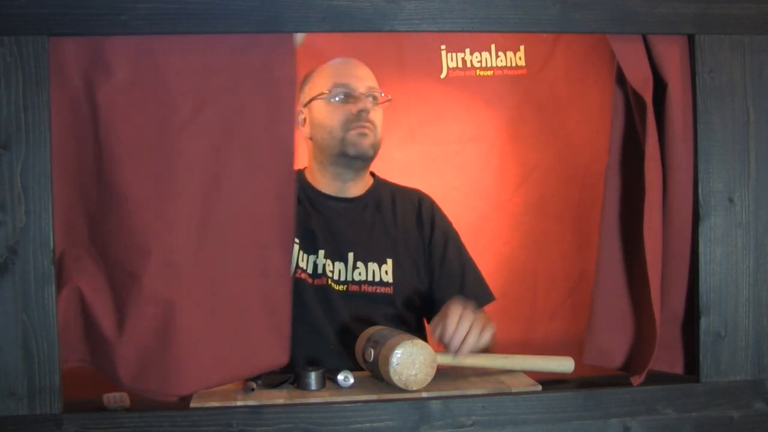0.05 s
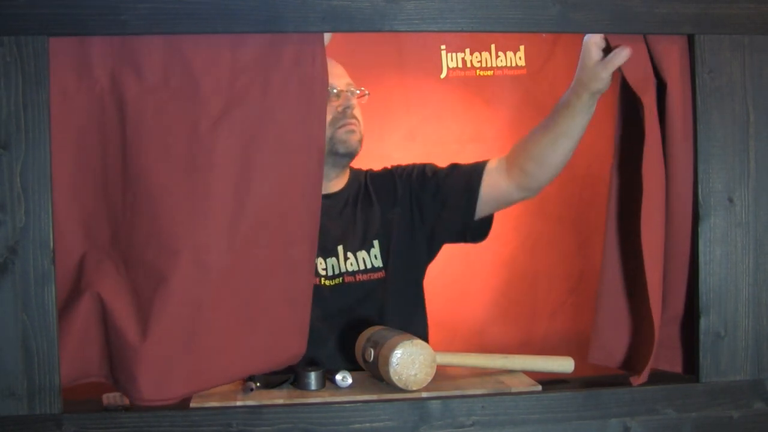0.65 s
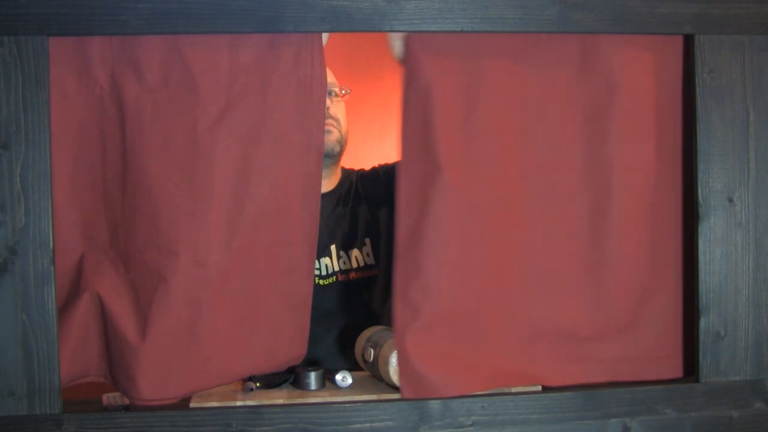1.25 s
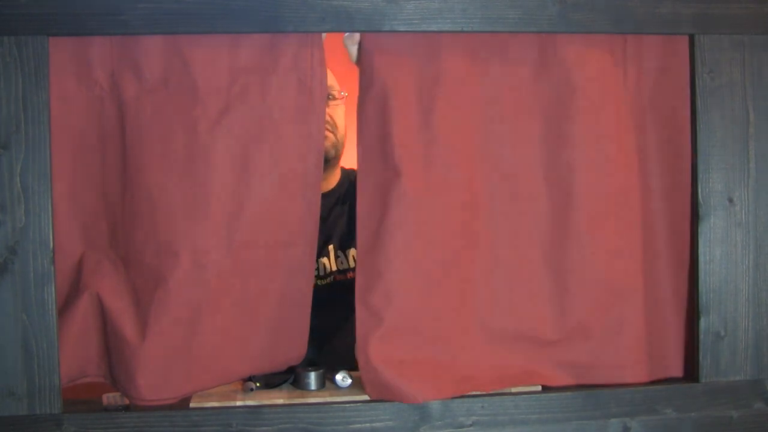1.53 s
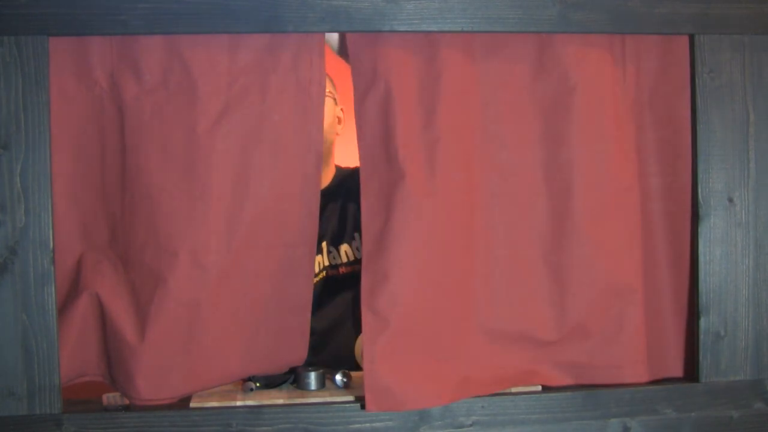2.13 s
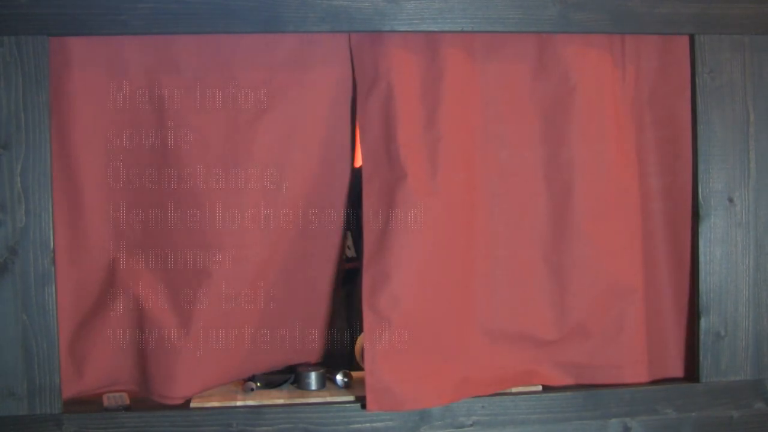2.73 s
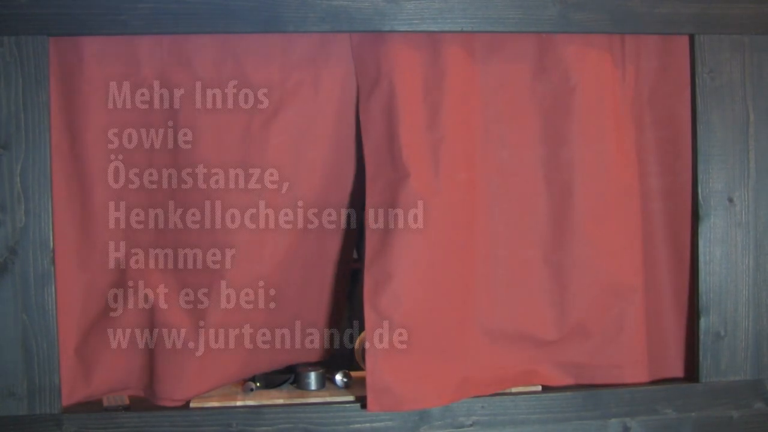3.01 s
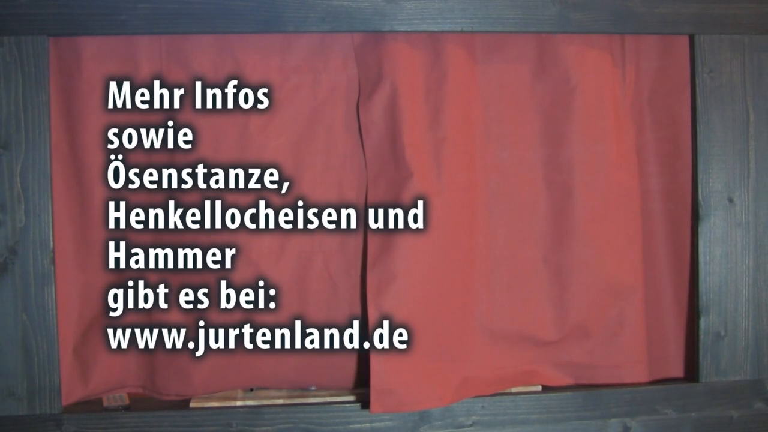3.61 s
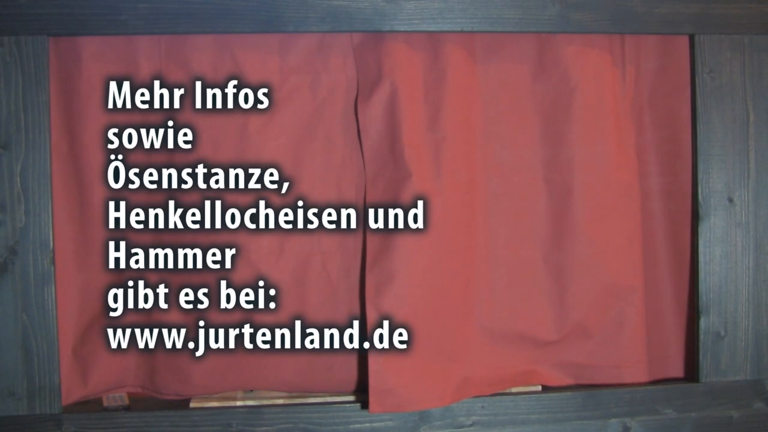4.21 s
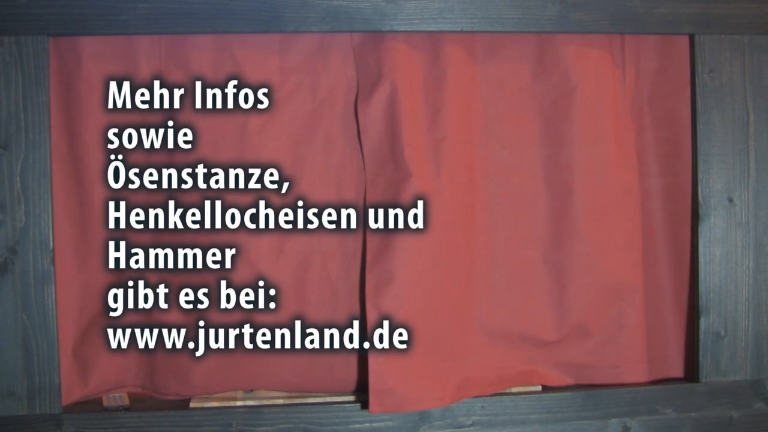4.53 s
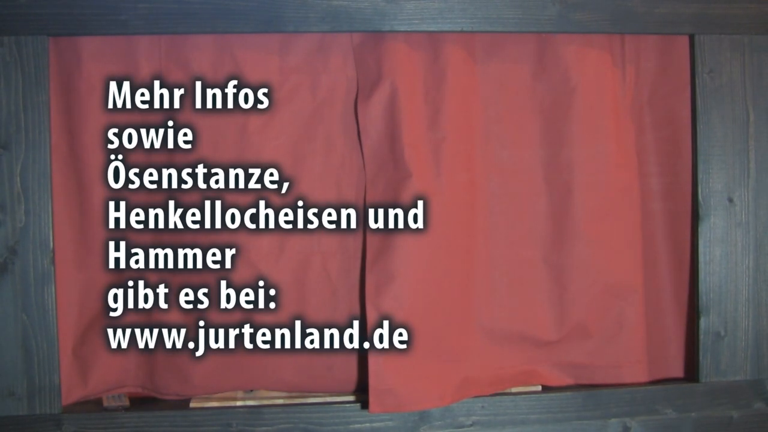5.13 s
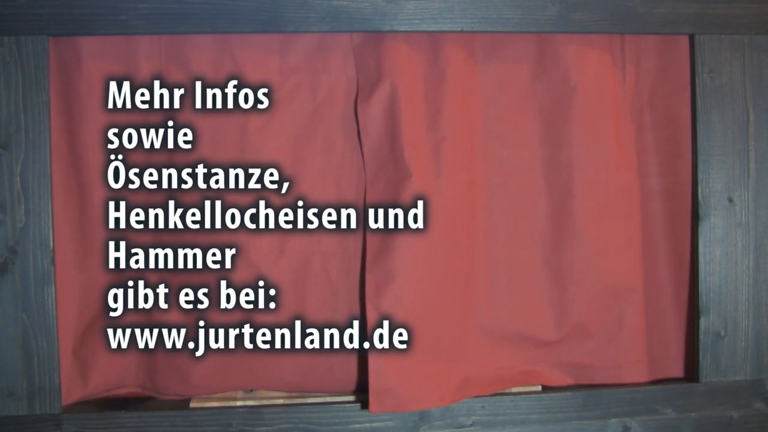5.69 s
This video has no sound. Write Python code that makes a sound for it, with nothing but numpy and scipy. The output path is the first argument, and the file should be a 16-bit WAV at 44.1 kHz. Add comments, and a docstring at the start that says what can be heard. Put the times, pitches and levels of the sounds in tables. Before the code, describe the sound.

Curtains are pulled shut by hand in a wooden booth, rasping and lightly rattling their eyelets, followed by soft clicks and knocks.

```python
"""A short rasping tug of heavy cloth comes first: curtains pulled shut by hand along a rod, in a small
wooden booth, close to a near-mono microphone. Pull after pull, the hem sticks and slips over the rod
and rings the frame; the weave zips, metal eyelets chatter and the folds puff air. The cloth settles,
leaving small ticks and dull wooden knocks over faint shuffling, room rumble, mains hum and hiss."""
import sys
import numpy as np
from scipy import signal
from scipy.fft import rfft, irfft
from scipy.io import wavfile
from scipy.ndimage import uniform_filter1d

SR = 44100
rng = np.random.default_rng(int(sys.argv[2]) if len(sys.argv) > 2 else 0)


def dump_mix(stems):
    """Bounce the given channels to the path in sys.argv[1] as a 16-bit WAV at rate SR."""
    frames = np.atleast_2d(stems).T  # one column per channel
    limited = np.clip(frames, -1, 1)  # hard clip at full scale
    pcm = np.round(limited * 32767).astype(np.int16)
    wavfile.write(sys.argv[1], SR, pcm)


N = 258407
T = np.arange(N) / SR

# each pull or brush of the cloth: (start [s], rise [s], slide [s], level [dB],
# change over the slide [dB], relative fibre hiss [dB], relative frame body [dB])
PULLS = [ (0.022, 0.0029, 0.051, -37, -5, -4.5, -6.5), (0.076, 0.0028, 0.074, -30, 1, -7, -12),
         (0.270, 0.1, 0.087, -35.5, 4.5, -12.5, -7), (0.560, 0.057, 0.049, -50, -1.5, -4, 2),
         (0.700, 0.048, 0.16, -57, -1, -2, -9), (0.895, 0.025, 0.056, -47.5, 0.5, 1.5, -12),
         (0.960, 0.045, 0.14, -41, -2, 0.5, -4), (1.110, 0.035, 0.19, -37, -1, -8.5, -10),
         (1.320, 0.043, 0.19, -38.5, -2.5, -9.5, -9.5), (1.735, 0.1, 0.037, -50.5, -3, -9, -7.5),
         (2.096, 0.004, 0.019, -52, -7, -1.5, -27), (2.140, 0.045, 0.052, -63.5, -2.5, -2, -10),
         (2.290, 0.069, 0.17, -56, -3, -7, -7), (2.502, 0.0074, 0.057, -34, -8.5, -6.5, -10),
         (2.530, 0.037, 0.099, -28.5, -2.5, -11.5, -11.5), (2.700, 0.046, 0.030, -42, 4.5, -15, -16),
         (2.772, 0.006, 0.029, -32, -1, -4.5, -4), (2.790, 0.036, 0.086, -27, -5.5, -10, -11.5),
         (2.980, 0.051, 0.052, -53.5, 0, -12, -4), (3.100, 0.044, 0.038, -50.5, 0.5, -14.5, -10.5),
         (3.372, 0.006, 0.15, -48, -12.5, -4.5, -4.5), (3.531, 0.0043, 0.13, -48.5, -3.5, -7.5, -4.5),
         (3.665, 0.052, 0.011, -49, -8.5, -5, -5), (3.962, 0.0051, 0.012, -56, -10, 0, 4),
         (3.995, 0.031, 0.02, -55.5, 1.5, -6.5, -6), (5.565, 0.024, 0.03, -64.5, 0.5, -6, 8.5),
         (5.680, 0.035, 0.030, -72, -3, 7, -9), ]
# spectrum of the rubbing cloth, heard close: (frequency [Hz], level [dB])
CLOTH_COLOUR = [(35, -67), (60, -25), (124, -13), (156, -1.5), (198, -3.5), (256, 2.5), (301, -0.5),
                (566, -4.5), (666, -3), (767, -2), (946, -1.5), (1740, -4.5), (6580, -17.5), (11800, -30),
                (16000, -46)]
# resonances of rod and frame: (frequency [Hz], width [Hz], level [dB])
FRAME_MODES = [(254.6, 19, -1.5), (468, 23, -6), (573, 15, 4.5), (740, 9.3, 6.5), (885, 22, -3.5),
               (1150, 130, -12.5), (1502, 24, -1.5), (2350, 28, -11), (2660, 8.4, -29)]
# the hem breaks free in a short rasp: (start [s], level [dB], length [s])
JERKS = [(0.014, -43.5, 0.018), (0.078, -26, 0.016), (0.443, -36.5, 0.03), (0.597, -43.5, 0.022),
         (1.005, -28, 0.036), (1.299, -39, 0.026), (1.822, -53, 0.088), (2.087, -56.5, 0.041),
         (2.814, -27, 0.018)]
# the weave runs over the rod: (start [s], length [s], first thread rate [Hz], final [Hz], level [dB])
ZIPS = [(0.077, 0.097, 798, 500, -38), (1.119, 0.205, 2700, 480.5, -37.5), (2.518, 0.21, 2002, 403, -38.5),
        (2.553, 0.0707, 616, 397, -40.5), (2.805, 0.066, 640, 448, -33.5)]
# metal eyelets chatter on the rod: (start [s], level [dB], length [s])
CHATTERS = [(0.022, -45, 0.011), (0.065, -43, 0.043), (0.138, -43, 0.023), (0.364, -44, 0.023),
            (0.445, -50, 0.025), (1.135, -48, 0.023), (1.295, -56, 0.024)]
# resonances of the eyelets: (frequency [Hz], width [Hz], level [dB])
EYELET_MODES = [(5070, 61, 13), (5570, 110, 7), (6200, 120, -1), (8500, 76, 8), (11450, 120, -10),
                (12150, 140, 0), (12700, 150, -10)]
# the hem catches on the rod: (time [s], impulse level [dB])
TICKS = [(1.6758, -26.5), (3.3733, -23.5), (3.5342, -26), (3.5612, -24), (3.9642, -42)]
# spectrum of one tick: (frequency [Hz], gain [dB])
TICK_COLOUR = [(60, -18), (200, 19), (400, 10), (1200, 13.5), (5000, 2), (9000, -17), (16000, -30)]
# dull knocks on the wood: (time [s], level before dulling [dB], contact brightness [Hz])
KNOCKS = [(0.338, -17.5, 1370), (1.6755, -25.5, 3440), (1.834, -31.5, 2500), (2.03, -40, 3520),
          (2.099, -34.5, 2020), (2.372, -39, 2000), (3.1531, -26.5, 2270), (3.3214, -34.5, 1640),
          (3.339, -33.5, 850), (4.657, -21, 1830), (5.588, -34, 740), (5.61, -39.5, 1510),
          (5.821, -32.5, 445)]
# resonances of the wood: (frequency [Hz], level [dB], t60 [s])
WOOD_MODES = [(173, -14.5, 0.19), (244.6, -13.5, 0.22), (363, -7.5, 0.062), (477, -10.5, 0.062),
              (552, -16.5, 0.1), (793, 0.5, 0.032), (870, -10, 0.052), (1020, -7, 0.03), (1166, -5, 0.058),
              (1240, 0, 0.018), (1494, -6.5, 0.024), (1723, -6.5, 0.027)]
# the frame's panel drones under a pull: (start [s], level [dB], length [s])
DRONES = [(0.40, -39, 0.11), (0.63, -53, 0.089), (2.58, -57, 0.3), (2.78, -34, 0.1)]
# puffs of air from the folds: (start [s], level [dB], length [s])
BILLOWS = [(0.03, -52.5, 0.14), (1.0, -59, 0.21), (1.19, -60, 0.14), (2.505, -53, 0.059)]
# shuffling behind the curtain: (start [s], relative level [dB], length [s])
SHUFFLES = [(0.62, -43.5, 0.15), (3.2, -49, 0.17), (4.0, -48, 0.15), (4.13, -55.5, 0.25), (5.15, -56, 0.15),
            (5.8, -60, 0.11)]
# muffled spectrum of that shuffling: (frequency [Hz], level [dB])
SHUFFLE_COLOUR = [(59, -10), (100, -27), (135, -7.5), (173, -17), (253, 1.5), (350, -5.5), (402, -25),
                  (553, -22), (700, -17), (910, -48), (1540, -120)]
# room tone at the microphone, rumble up to hiss: (frequency [Hz], level [dB])
ROOM_TONE_COLOUR = [(12, -37), (20, -29), (53, -21), (91, -5), (154, 2.5), (204, -2.5), (399, -9.5),
                    (558, -11), (1220, -15.5), (2600, -19.5), (2820, -19.5), (6910, -22.5), (12400, -26),
                    (14300, -21), (16000, -35)]
# faint noise in the side channel: (frequency [Hz], level [dB])
SIDE_COLOUR = [(12, -37), (20, -15), (101, 6.5), (182, -0.5), (542, -4), (590, -12.5), (4940, -11),
               (14700, -10), (16000, -9)]


def hem_scrape(rasp_db=-1, hiss_db=-1.5, body_db=-1.5):
    """Slips of the hem sound through cloth and frame; pressure moves the body, speed the hiss."""
    grip = undb(walk(130))
    friction = grip * (slips(per_s=3500, spread_db=0) + undb(1.5) * rng.standard_normal(N))
    cloth = colour(friction, CLOTH_COLOUR)
    cloth = unit(cloth + sum(undb(db) * ring(cloth, hz, width) for hz, width, db in FRAME_MODES))
    body = unit(cut(cut(cloth, 476, "low", order=4), 64, "high"))
    rasp = unit(cut(cloth, [420, 3200], "band", order=4))
    hiss = unit(cut(cloth, 3490, "high", order=4))
    power = np.zeros((3, N))  # overlapping pulls add in power, band by band
    for start, rise, slide, db, change_db, speed_db, press_db in PULLS:
        shares = undb([rasp_db, speed_db + hiss_db, press_db + body_db])
        power += np.outer(shares ** 2, pull_gain(start, rise, slide, db, change_db) ** 2)
    return np.sum(np.sqrt(power) * [rasp, hiss, body], axis=0)


def pull_gain(start, rise, slide, db, change_db, climb_db=15, run_out_db_per_s=214):
    """One pull gathers speed, slides on, and dies away once the hand stops."""
    since = T - start
    pulling_db = np.interp(since, [0, rise, rise + slide], [db - climb_db, db, db + change_db])
    run_out_db = run_out_db_per_s * np.maximum(since - rise - slide, 0)
    return undb(pulling_db - run_out_db) * (since >= 0)


def fold_jerks():
    """A bunched fold lets go: a quick, brighter shower of slips."""
    spectrum = [(100, -27), (400, 7.5), (1000, 4), (4000, 2.5), (8000, -7.5), (16000, -18.5)]
    shower = unit(colour(slips(per_s=20000, spread_db=6), spectrum))
    swell = sum(gate([s, s + length / 2, s + length], [db - 6, db, db - 11]) for s, db, length in JERKS)
    return shower * swell


def weave_zips(overtone_db=-12, speed_spread=.08, side_fold_db=-5, brake_share=.35, edge_db=7):
    """Threads of three folds bump over the rod at slightly different speeds: a ragged, falling buzz."""
    out = 0
    for start, length, first_hz, final_hz, db in ZIPS:
        braking = np.maximum(T - start, 0) / (brake_share * length)  # 1 halfway down the fall
        thread_hz = final_hz + (first_hz - final_hz) / (1 + braking ** 3)
        buzz = 0
        for fold in (-1, 0, 1):
            fold_hz = thread_hz * (1 + fold * speed_spread + .1 * walk(900))
            phase = 2 * np.pi * np.cumsum(fold_hz) / SR
            tone = np.sin(phase) + undb(overtone_db) * np.sin(2 * phase)
            buzz += tone * undb(2 * walk(200) + side_fold_db * abs(fold))
        corners = start + length * np.array([0, .2, .6, 1])
        out += unit(buzz) * gate(corners, [db - edge_db, db, db, db - edge_db])
    # a zip flares where it falls through the rod's resonance
    return out + undb(3) * ring(out, hz=780, width_hz=39)


def eyelet_chatter():
    """Showers of tiny contacts with the rod ring the metal eyelets."""
    contacts = slips(per_s=1200, spread_db=2)
    metal = sum(undb(db) * ring(contacts, hz, width) for hz, width, db in EYELET_MODES)
    return unit(cut(metal, 2800, "high")) * swells(CHATTERS, edge_db=9)


def hem_ticks():
    """The hem catches on the rod in single dry snaps."""
    hits = np.zeros(N)
    for s, db in TICKS:
        hits[int(s * SR)] += undb(db)
    return colour(hits, TICK_COLOUR)


def wood_knocks(thud_db=1, thud_t60=.037):
    """Each blow rings the wood with a short thud; a softer contact is duller."""
    out, t = np.zeros(2 * N), T[:SR // 2]
    for s, db, bright_hz in KNOCKS:
        modes = sum(undb(mode_db - 60 * t / t60) * np.sin(2 * np.pi * (hz * t + rng.random()))
                    for hz, mode_db, t60 in WOOD_MODES)
        thud = undb(thud_db - 60 * t / thud_t60) * rng.standard_normal(len(t))
        blow = modes + cut(thud, 190, "high", order=4)
        dulled = cut(blow / np.abs(blow).max(), bright_hz, "low", order=8)
        start = int(s * SR)
        out[start:start + len(t)] += undb(db) * dulled
    return out[:N]


def panel_drone(mode_hz=256.3):
    """A hard pull rings the frame's panel at its lowest mode, level and phase wandering."""
    phase = 2 * np.pi * mode_hz * T + .4 * walk(12)
    tone = np.sin(phase) * undb(1.9 * walk(30.8))
    return unit(tone) * swells(DRONES, edge_db=12)


def cloth_billows():
    """Swinging folds push low puffs of air at the microphone."""
    return unit(cut(rng.standard_normal(N), [70, 135], "band")) * swells(BILLOWS, edge_db=12)


def shuffling(gain_db=-8.5):
    """Soft low movement on the far side of the curtain."""
    muffled = unit(colour(rng.standard_normal(N), SHUFFLE_COLOUR))
    return undb(gain_db) * muffled * swells(SHUFFLES, edge_db=8)


def booth(x, wet_db, t60, treble_t60):
    """Direct sound plus a short diffuse tail from booth and room; the treble has its own decay time."""
    t, noise = T[:SR // 2], cut(rng.standard_normal(SR // 2), 223, "high")
    low = cut(noise, 3600, "low", order=1)
    tail = low * undb(-60 * t / t60) + (noise - low) * undb(-60 * t / treble_t60)
    tail *= t > .003  # reflections reach the microphone 3 ms late
    wet = undb(wet_db) * signal.fftconvolve(x, tail / np.sqrt(np.sum(tail ** 2)))[:N]
    return (x + wet) / np.sqrt(1 + undb(2 * wet_db))


def room_tone(air_db=-63, hum_hz=50, hum_db=-72.5, side_db=-73):
    """Rumble, hiss and mains hum in the centre, with a trace of noise in opposite phase left and right."""
    air = undb(air_db) * unit(colour(rng.standard_normal(N), ROOM_TONE_COLOUR))
    hum = undb(hum_db) * unit(np.sin(2 * np.pi * hum_hz * T))
    side = undb(side_db) * unit(colour(rng.standard_normal(N), SIDE_COLOUR))
    return air + hum + side * np.array([[1], [-1]])


def undb(db):
    """Decibels to gain."""
    return 10 ** (np.asarray(db) / 20)


def unit(x):
    """Scale to rms 1."""
    return x / np.sqrt(np.mean(x ** 2))


def colour(x, points):
    """Causal filter through (frequency [Hz], gain [dB]) points, built from the cepstrum."""
    hz, db = np.transpose(points)
    size = 2 * len(x)
    bin_hz = np.maximum(np.fft.rfftfreq(size, 1 / SR), 1)
    gain = undb(np.interp(np.log(bin_hz), np.log(hz), db))
    cepstrum = irfft(np.log(gain))
    cepstrum[1:size // 2] *= 2
    cepstrum[size // 2 + 1:] = 0
    return irfft(rfft(x, size) * np.exp(rfft(cepstrum)))[:len(x)]


def cut(x, hz, kind, order=2):
    """Butterworth filter."""
    return signal.sosfilt(signal.butter(order, hz, kind, fs=SR, output="sos"), x)


def ring(x, hz, width_hz):
    """One resonance, gain 1 at its centre."""
    return signal.lfilter(*signal.iirpeak(hz, hz / width_hz, fs=SR), x)


def walk(per_s):
    """Random wander that turns per_s times a second; spread near 1."""
    return np.interp(T * per_s, np.arange(N), rng.standard_normal(N))


def slips(per_s, spread_db):
    """Dense tiny stick-slip releases of uneven size."""
    size = undb(spread_db * np.clip(rng.standard_normal(N), -2, 2))
    released = rng.random(N) < per_s / SR
    return unit(released * rng.standard_normal(N) * size)


def gate(times, db):
    """Gain along a level curve, silent outside it, with softened edges."""
    return uniform_filter1d(np.interp(T, times, undb(db), left=0, right=0), size=90)


def swells(table, edge_db):
    """Gain that rises and falls once for each row of (start [s], level [dB], length [s])."""
    return sum(gate([s, s + length / 2, s + length], [db - edge_db, db, db - edge_db])
               for s, db, length in table)


def scene():
    """All sources sit straight ahead of the microphone; the cloth is drier than the knocks."""
    curtain = hem_scrape() + fold_jerks() + weave_zips() + eyelet_chatter() + hem_ticks()
    cloth = booth(curtain, wet_db=-9.5, t60=.32, treble_t60=.34)
    wood = booth(wood_knocks(), wet_db=0, t60=.22, treble_t60=.4)
    return cloth + wood + panel_drone() + cloth_billows() + shuffling() + room_tone()


def record(dry):
    """The recorder cuts the top steeply above 15.9 kHz."""
    return signal.sosfilt(signal.ellip(10, .2, 70, 15900, fs=SR, output="sos"), dry)


dry = scene()
out = record(dry)
dump_mix(out)
```